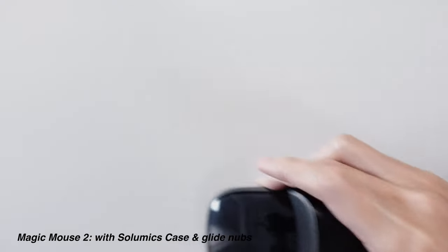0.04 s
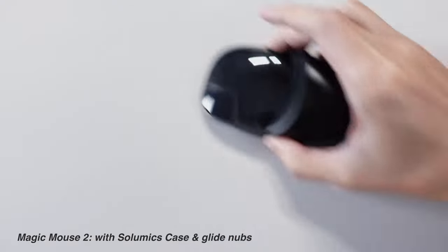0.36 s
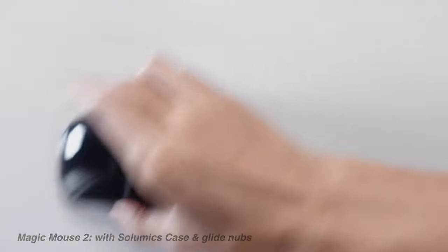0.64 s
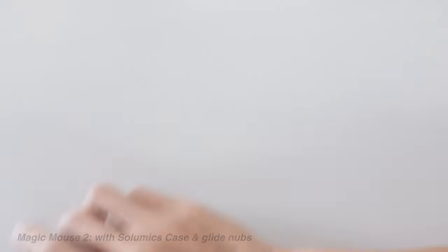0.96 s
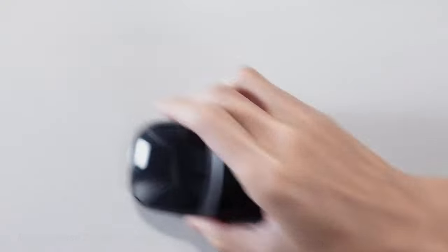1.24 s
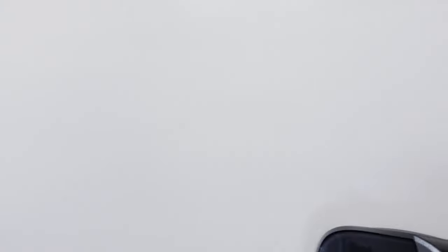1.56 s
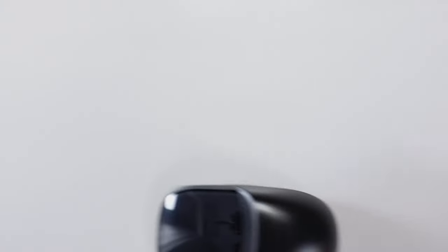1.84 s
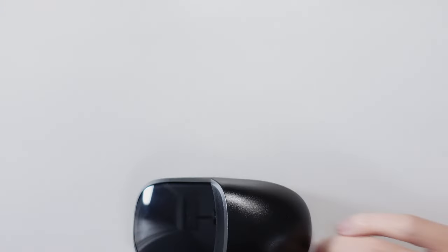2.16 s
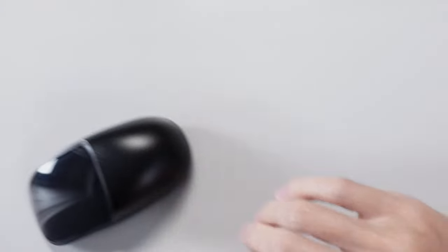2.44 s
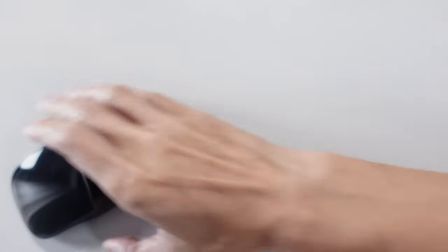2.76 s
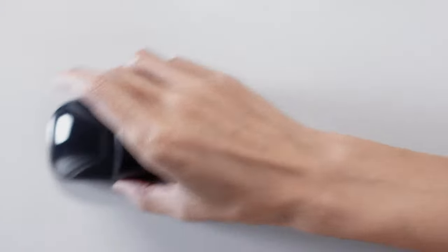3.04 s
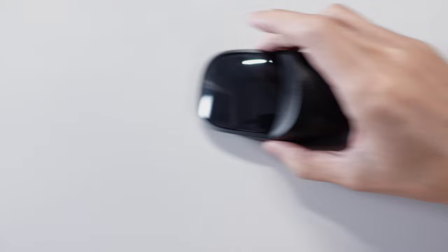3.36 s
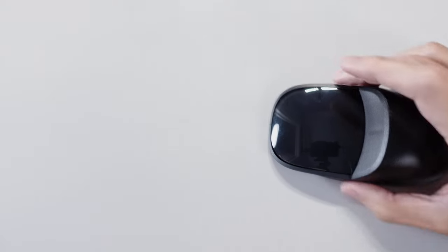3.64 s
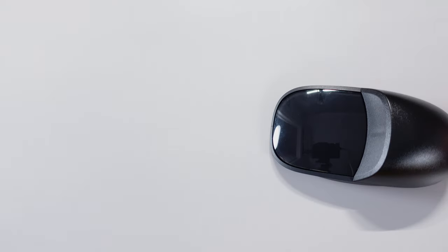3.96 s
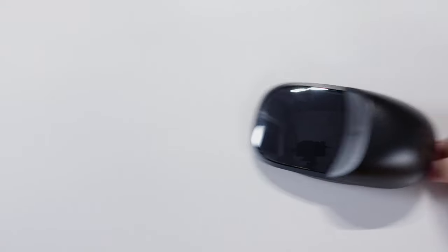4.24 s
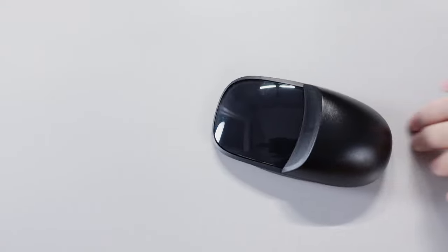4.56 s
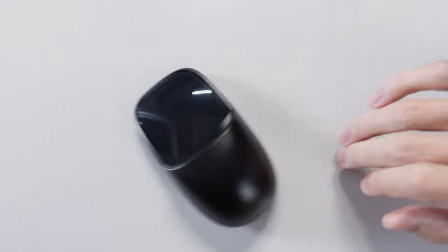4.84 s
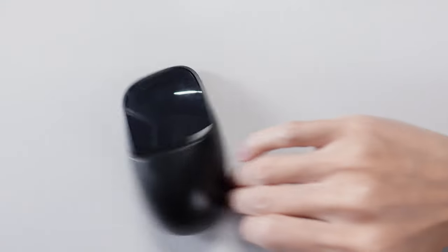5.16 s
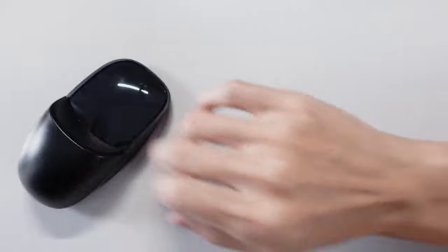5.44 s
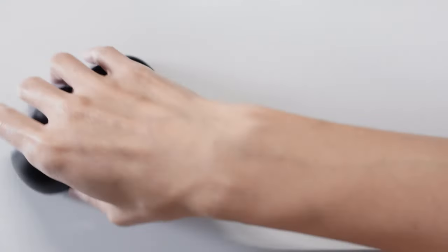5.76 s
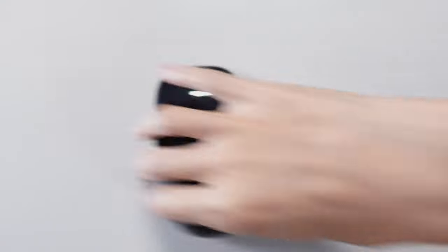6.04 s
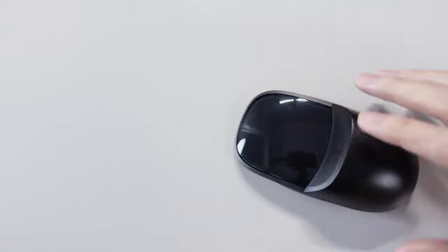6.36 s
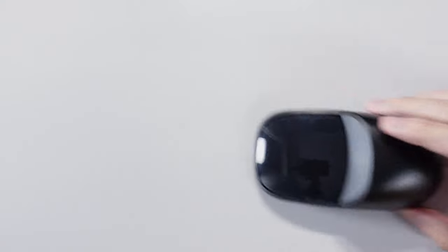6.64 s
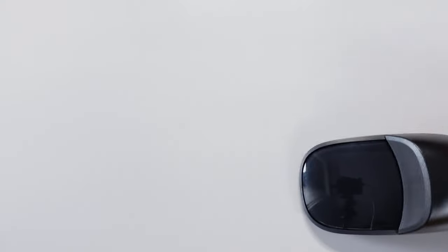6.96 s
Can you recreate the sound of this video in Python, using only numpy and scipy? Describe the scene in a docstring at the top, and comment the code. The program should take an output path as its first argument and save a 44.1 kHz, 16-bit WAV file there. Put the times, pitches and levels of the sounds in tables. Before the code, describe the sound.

A plastic computer mouse is swept and flicked across a desk, hissing and rasping, with sharp clacks and soft bumps.

```python
"""First comes the hiss and rasp of a plastic computer mouse swept over a smooth desk, close by in a quiet
room. Its feet hiss on the fine grain; coarser grain rasps the shell and drums the desk top, and the
colour shifts as the mouse travels and turns. Fingers bump, a foot squeaks, skin brushes the desk and
the forearm sways it. Five times a finger flicks the mouse: the loose case clacks, then it glides to
a stop."""
import sys
import numpy as np
from scipy import signal
from scipy.fft import rfft, irfft, next_fast_len
from scipy.io import wavfile
from scipy.ndimage import uniform_filter1d, map_coordinates

SR = 44100
rng = np.random.default_rng(int(sys.argv[2]) if len(sys.argv) > 2 else 0)


def generate_wav(signal):
    """Clip the signal to [-1, 1] and save it as 16-bit WAV at the path in sys.argv[1]."""
    frames = np.transpose(np.atleast_2d(signal))
    scaled = np.clip(frames, -1, 1) * 32767
    pcm = np.round(scaled).astype(np.int16)
    wavfile.write(sys.argv[1], SR, pcm)


N = 308700

# Strokes with the mouse in hand; levels at top speed, ahead of the trims in scene():
# (start [s], fastest [s], stop [s], desk rumble [dB], desk drumming [dB], shell rasp [dB], hiss [dB],
# hiss tilt [dB/octave], singing resonance [Hz], its level over the rasp [dB])
SWEEPS = [ (-.15, .05, 0.23, -38.5, -35.5, -36, -33.5, 1.5, 595, -8),
          (.13, .34, 0.58, -38.5, -32, -28, -32.5, -2, 2010, -12),
          (.42, .80, 0.98, -35.5, -27, -22.5, -32.5, 1, 2100, -23),
          (.975, 1.09, 1.3, -36, -34.5, -28.5, -30.5, 0.5, 4900, -14),
          (1.23, 1.348, 1.36, -36.5, -32, -30, -34.5, 3, 1950, -14),
          (2.84, 3.25, 3.75, -36.5, -31, -31.5, -38.5, 2, 877, -8),
          (5.745, 5.82, 5.97, -35, -35.5, -46, -58, -4.5, 802.4, -6),
          (5.88, 6.12, 6.455, -36, -25, -24.5, -35.5, 5.5, 611, -10.5),
          (6.56, 6.73, 6.943, -37.5, -38.5, -37, -36.5, -1.5, 2301, -14)]
# Slow sway of the whole desk: (pitch [Hz], width [Hz], held level [dB], gliding level [dB])
DESK_SWAY = [(81, 3.5, 4, 2), (101.7, 8.1, 3, -3.5), (124.4, 21, 2, -3.5), (141.8, 11.6, -1, 5.5),
             (163.5, 25, 1, -10)]
# Bending modes of the desk top: (pitch [Hz], width [Hz], held level [dB], gliding level [dB])
DESK_TOP = [(214.9, 11.6, -4.5, 1), (246.5, 11.7, 3, -3), (273.4, 26, -3.5, -18), (308, 65, -14.5, -19),
            (396.1, 11.7, 5.5, 1.5), (433, 14.6, 1.5, -3.5), (458.4, 6.3, -4, -8), (463, 48, -12.5, -10.5)]
# Resonances of the shell on the desk: (pitch [Hz], width [Hz], held level [dB], gliding level [dB])
SHELL_MODES = [(556, 96, -6.5, -1.5), (715, 88, -5, 4), (843, 55, 0, 5.5), (909, 49, 2.5, 6),
               (1117, 200, -2, 2.5), (1343, 135, -1, 2.5), (1511, 80, 2.5, 7), (1724, 160, -3, -1),
               (1970, 136, -5.5, 0), (2246, 73, -5.5, 1.5), (2463, 94, -11, -9.5), (2720, 130, -14, -7.5),
               (3520, 400, -14, -9)]
# Colour of the feet's hiss: (frequency [Hz], held level [dB], gliding level [dB])
HISS_EQ = [(1500, -10, -9), (3040, -2.5, -10.5), (4040, -3.5, -5.5), (4570, -2.5, -8), (5200, 5.5, 5),
           (6050, 1.5, 3), (6600, -3, -1), (7930, -1, 1), (8850, -4, -2), (9450, -1.5, -2.5),
           (10400, -2, -1.5), (11700, -4, -2.5), (12500, -3.5, -3), (15300, -10, -6.5)]
# Colour of the quiet room: (frequency [Hz], level [dB])
ROOM_TONE_EQ = [(25, -8.5), (80, 4), (130, -5), (250, -8), (500, -16.5), (1000, -21), (2500, -24.5),
                (8000, -27.5), (15700, -29)]
# Soft bumps of fingers and feet: (time [s], thud [dB], tap [dB])
BUMPS = [(.518, -43, -26.5), (2.08, -36, -40.5), (2.398, -23, -28), (2.441, -24, -23), (2.69, -34, -59),
         (2.928, -26, -50), (2.943, -26, -33), (2.962, -23.5, -30), (2.999, -40, -26), (3.08, -52, -23),
         (3.733, -26, -38), (3.8, -41, -42.5), (4.281, -25.5, -39), (4.559, -34.5, -34),
         (4.596, -36, -35.5), (4.9, -45, -25.5), (5.092, -35, -31), (5.134, -37, -42), (5.599, -31, -37.5),
         (5.77, -33, -37), (5.987, -38, -17)]
# Decay of the room: (frequency [Hz], t60 [s])
ROOM_DECAY = [(150, 0.46), (1500, 0.22), (6000, 0.42), (14000, 0.047)]
# A foot catches and squeaks: (centre [s], length [s], pitch [Hz], level [dB])
SQUEAKS = [(.84, 0.16, 2150, -37), (.945, .035, 4870, -46), (1.1, 0.13, 2090, -33.5),
           (1.736, 0.054, 2770, -38), (6.162, 0.12, 2226, -31.5)]
# The hand bears down for a moment: (centre [s], length [s], drumming change [dB], rasp change [dB])
PRESSES = [(0.888, 0.13, 4.5, 2), (1.165, 0.12, 9.5, 6), (1.236, 0.11, 13.5, 9), (3.11, 0.12, 5.5, 3.5),
           (6.05, .08, 2.5, 0), (6.207, 0.12, -2.5, 1.5)]
# Scuffs as the fingers take hold, turn or let go, ahead of the trims:
# (time [s], length [s], rasp [dB], hiss [dB])
GRABS = [(0.938, 0.11, -48, -54), (2.838, 0.1, -47, -44), (3.614, 0.19, -50, -48.5),
         (5.755, 0.17, -51, -49), (6.38, 0.12, -54, -57), (6.582, 0.014, -46, -48)]
# Hard contacts of nail, case and mouse:
# (time [s], click [dB], click t60 [s], pitch of the struck spot [Hz], knock [dB], knock pitch [Hz])
CLACKS = [(1.6387, -11.5, 0.015, 6360, -5, 932), (1.6439, -11.5, 0.0066, 7550, -24, 910),
          (1.7026, -17, 0.005, 2740, -13.5, 1050), (1.7775, -23.5, 0.032, 7440, -36, 1000),
          (2.2715, -17, 0.0057, 3640, -14, 1020), (2.2735, -12.5, 0.013, 3380, -3, 1008),
          (4.2513, -10, 0.01, 5470, -12, 900), (4.2787, -18, 0.0076, 2600, -10.5, 990),
          (4.6917, -8.5, 0.0095, 8240, -10.5, 1120), (4.6945, -9.5, 0.0082, 2260, -4.5, 1005),
          (5.1945, -13.5, 0.013, 5460, -4.5, 1090), (5.1968, -9.5, 0.0077, 3460, -2, 925)]
# Colour of the plastic's click: (frequency [Hz], level [dB])
CLICK_EQ = [(500, -40), (1900, -13), (3200, 9.5), (4300, -3.5), (5600, 7.5), (6800, 2.5), (8100, 3),
            (9800, -8), (11200, -1.5), (12500, 1), (15700, -10.5)]
# Modes of the hollow case: (multiple of the knock pitch [ratio], level [dB], t60 [s])
CASE_MODES = [(.45, -24, 0.095), (1, -2, 0.017), (1.16, -5.5, 0.022), (1.39, 5.5, 0.0047),
              (1.719, -51, 0.024), (2.4, -16.5, 0.015)]
# Free glides after a flick: the columns of SWEEPS, then (skid relative to the hiss [dB])
GLIDES = [ (1.645, 1.715, 2.066, -37, -36.5, -33, -36, -2, 1090, -10, -7),
          (2.297, 2.368, 2.687, -32, -28, -31.5, -34.5, 0.5, 2230, -10, -3),
          (4.26, 4.305, 4.524, -34.5, -36.5, -39.5, -34.5, -1, 1183, -6.5, -29),
          (4.70, 4.76, 5.064, -30.5, -33, -33.5, -36.5, 1, 2090, -13.5, 3),
          (5.205, 5.26, 5.56, -29.5, -33, -30, -38.5, -0.5, 1650, -12, 1)]
# The forearm drags on the desk: (centre [s], length [s], level [dB])
FOREARM_DRAGS = [(1.72, 0.062, -34), (2.718, .2, -43), (3.68, 0.57, -43), (4.596, 0.15, -47),
                 (5.72, 0.56, -39.5), (6.302, 0.42, -36.5), (6.723, 0.059, -36)]
# Skin brushes the desk as the hand reaches and sweeps: (centre [s], length [s], level [dB])
BRUSHES = [(2.202, 0.27, -52), (3.385, 0.53, -42), (4.26, 0.062, -54), (5.165, 0.16, -49),
           (5.692, 0.083, -58), (6.015, 0.37, -39.5)]
# Each layer grows as a power of the speed: (rumble, drumming, rasp, hiss) [exponents]
HELD_POWERS, FREE_POWERS = (0.39, 1.31, 2.02, 1.2), (0.45, 0.66, 1.06, 0.76)


def amp(db):
    """Decibels to gain."""
    return 10 ** (np.asarray(db) / 20)


def unit(x):
    """x at rms 1."""
    return x / np.sqrt(np.mean(x ** 2) + 1e-20)


def along(points, hz):
    """Read (frequency [Hz], value) points on a log axis."""
    f, v = np.transpose(points)
    return np.interp(np.log(hz + 1), np.log(f), v)


def filtered(x, response):
    """x through a frequency response."""
    m = next_fast_len(len(x) + SR // 2)
    return irfft(rfft(x, m) * response(np.fft.rfftfreq(m, 1 / SR)), m)[:len(x)]


def coloured(x, eq):
    """x through an EQ curve, at rms 1."""
    return unit(filtered(x, lambda hz: amp(along(eq, hz))))


def resonate(x, modes):
    """x through a body's modes, alternating in polarity: (pitch [Hz], width [Hz], level [dB])."""
    return filtered(x, lambda f: sum(
        (-1) ** k * amp(db) * 1j * f * width / (hz * hz - f * f + 1j * f * width)
        for k, (hz, width, db) in enumerate(modes)))


def body(table, free):
    """A body's modes in a free glide or under the hand's weight."""
    return [(hz, width, free_db if free else held_db) for hz, width, held_db, free_db in table]


def soften(x, edge_hz):
    """A soft contact passes little above its edge."""
    return signal.sosfilt(signal.butter(2, edge_hz, fs=SR, output="sos"), x)


def steady(x, memory_s):
    """Continuous rubbing keeps a mode at an even strength."""
    power = uniform_filter1d(x ** 2, max(2, round(memory_s * SR)))
    return x / np.sqrt(abs(power) + 1e-20)


def wobble(rate):
    """A smooth random curve, rate knots a second."""
    return map_coordinates(rng.standard_normal(int(N * rate / SR) + 4), [np.arange(N) * rate / SR])


def swell(s, length):
    """A smooth rise and fall around time s."""
    return np.exp(-(2 * (np.arange(N) / SR - s) / length) ** 2)


def decay(t, t60):
    """A fade of 60 dB every t60 seconds."""
    return np.exp(-np.log(1000) * t / t60)


def add(track, s, sound):
    """Mix a sound into the track at time s."""
    part = track[round(s * SR):][:len(sound)]
    part += sound[:len(part)]


def layer_gains(speed, levels_db, powers):
    """Rumble, drumming, rasp and hiss ride the speed of a stroke."""
    return np.array([amp(db) * np.maximum(speed, 1e-6) ** power for db, power in zip(levels_db, powers)])


def sweep(t, times, levels_db):
    """The hand speeds the mouse up and slows it again in one smooth arc."""
    speed = np.sin(np.interp(t, times, [0, np.pi / 2, np.pi]))
    return layer_gains(speed, levels_db, HELD_POWERS)


def friction_tone(noise, hz, q):
    """Friction feeds one narrow resonance: noise rung through it twice."""
    mode = [(hz, hz / q, 0)]
    return unit(resonate(resonate(noise, mode), mode))


def travel(strokes, motion):
    """Lay out strokes of one kind: four layer envelopes, the hiss tilts and the singing of the feet."""
    powers, tilts, singing = np.zeros((4, N)), [], np.zeros(N)
    for start, fastest, stop, rumble_db, drum_db, rasp_db, hiss_db, tilt, hz, tone_db, *skid in strokes:
        onset = max(start, 0)
        t = np.arange(onset, stop, 1 / SR)
        layers = motion(t, (start, fastest, stop), (rumble_db, drum_db, rasp_db, hiss_db), *skid)
        for track, layer in zip(powers, layers):
            add(track, onset, layer ** 2)  # overlapping strokes add in power
        _, _, rasping, _ = layers
        tone = friction_tone(rng.standard_normal(N)[:len(t)], hz, q=8.5)
        add(singing, onset, amp(tone_db) * rasping * tone)
        tilts.append((fastest, tilt))
    return np.sqrt(powers), tilts, singing


def grain(rate, spread_db):
    """Tiny collisions of the feet with the surface, at random times and sizes."""
    struck = rng.random(N) < rate / SR
    return unit(struck * rng.standard_normal(N) * amp(spread_db * rng.standard_normal(N)))


def drifting(x, drift_db, width_hz, hold_s):
    """Bands swell and fade at random, as when the contact meets other spots of the desk."""
    hz, t, spectrum = signal.stft(x, SR, nperseg=1024)
    drift = rng.standard_normal(spectrum.shape)
    for axis, span in enumerate([width_hz / hz[1], hold_s / t[1]]):
        for _ in range(2):
            drift = uniform_filter1d(drift, max(1, round(span)), axis, mode="wrap")
    return unit(signal.istft(spectrum * amp(drift_db * unit(drift)), SR, nperseg=1024)[1][:N])


def tilted(x, tilts, pivot_hz=8000):
    """The hiss turns brighter or duller with the angle of the mouse in each stroke."""
    hz, t, spectrum = signal.stft(x, SR, nperseg=256)
    octaves = np.log2(np.maximum(hz, pivot_hz / 2) / pivot_hz)
    slope = np.interp(t, *np.transpose(tilts))
    return signal.istft(spectrum * amp(np.outer(octaves, slope)), SR, nperseg=256)[1][:N]


def slide(gains, tilts, free, trims_db, chatter_db, rasp_edge_hz, bite_db):
    """Coarse grain shakes desk and shell, fine grain hisses; the load on the feet chatters."""
    rumbling, drumming, rasping, hissing = (gain * amp(db) for gain, db in zip(gains, trims_db))
    load = amp(chatter_db * wobble(130))
    coarse = grain(rate=5000, spread_db=1.5) * load
    rumble = steady(soften(resonate(coarse, body(DESK_SWAY, free)), edge_hz=270), memory_s=0.16)
    drum = steady(soften(resonate(coarse, body(DESK_TOP, free)), edge_hz=433), memory_s=0.14)
    shell = drifting(resonate(coarse, body(SHELL_MODES, free)), drift_db=2.0, width_hz=130, hold_s=0.14)
    dull = steady(soften(shell, rasp_edge_hz), memory_s=0.075)
    # harder rubbing makes shorter collisions, so the rasp opens up
    bright = coloured(shell, [(1500, -25), (2800, -2.5), (3700, -7), (5000, -10), (9000, -30)])
    bite = amp(bite_db) * bright * rasping / rasping.max()
    hiss_eq = [(hz, free_db if free else held_db) for hz, held_db, free_db in HISS_EQ]
    fine = coloured(grain(rate=27000, spread_db=5.0) * np.sqrt(load), hiss_eq)
    hiss = tilted(drifting(fine, drift_db=2.3, width_hz=230, hold_s=0.13), tilts)
    return rumbling * rumble + drumming * drum + rasping * (dull + bite) + hissing * hiss


def room_tone():
    """A steady, dark bed of noise from the quiet room."""
    return amp(-48.5) * coloured(rng.standard_normal(N), ROOM_TONE_EQ)


def bumps(thud_hz=118, thud_t60=0.086, thud_rise_s=0.0064):
    """Soft blows: a slow, damped push into the desk and a dull tap on the shell."""
    out, t = np.zeros(N), np.arange(SR // 3) / SR
    thud = np.sin(2 * np.pi * thud_hz * t) * decay(t, thud_t60) * (1 - np.exp(-t / thud_rise_s))
    ring = resonate(signal.unit_impulse(len(t)), body(DESK_TOP + SHELL_MODES, free=False))
    tap = soften(ring, edge_hz=570)
    for s, thud_db, tap_db in BUMPS:
        add(out, s, amp(thud_db) * thud / abs(thud).max() + amp(tap_db) * tap / abs(tap).max())
    return out


def room_reverb(x):
    """The short tail of a small room; the top treble dies first."""
    hz, t, spectrum = signal.stft(rng.standard_normal(SR // 2), SR, nperseg=256)
    fade = decay(t, along(ROOM_DECAY, hz)[:, None])
    tail = signal.istft(spectrum * fade, SR, nperseg=256)[1]
    return signal.fftconvolve(x, tail / np.linalg.norm(tail))[:N]


def squeaks():
    """A foot sticks and slips, feeding one narrow resonance for a moment."""
    return sum(amp(db) * swell(s, length) * friction_tone(rng.standard_normal(N), hz, q=12)
               for s, length, hz, db in SQUEAKS)


def presses_and_grabs(gains, grab_rise_s=0.0037):
    """The hand's weight changes the drive on desk and shell; each grab adds a sudden, fading scuff."""
    rumbling, drumming, rasping, hissing = gains.copy()
    for s, length, drum_db, rasp_db in PRESSES:
        weight = swell(s, length)
        drumming *= amp(drum_db * weight)
        rasping *= amp(rasp_db * weight)
    for s, length, rasp_db, hiss_db in GRABS:
        scuff = np.interp(np.arange(0, length, 1 / SR), [0, grab_rise_s, length], [0, 1, 0]) ** 0.5
        add(rasping, s, amp(rasp_db) * scuff)
        add(hissing, s, amp(hiss_db) * scuff)
    return rumbling, drumming, rasping, hissing


def clacks(knock_rise_s=0.0014, spot_db=-4, spot_width_hz=650, ring_db=-29, ring_t60=0.11):
    """Each hard contact snaps the plastic, which rings on faintly, and knocks the hollow case."""
    out, t = np.zeros(N), np.arange(SR // 8) / SR
    attack = 1 - np.exp(-t / knock_rise_s)
    for s, click_db, click_t60, spot_hz, knock_db, knock_hz in CLACKS:
        snap, spot_noise = rng.standard_normal((2, len(t)))
        spot = unit(resonate(spot_noise, [(spot_hz, spot_width_hz, 0)]))
        plastic = unit(coloured(snap, CLICK_EQ) + amp(spot_db) * spot)
        click = plastic * (decay(t, click_t60) + amp(ring_db) * decay(t, ring_t60))
        knock = sum(amp(db + rng.normal(0, 1)) * decay(t, t60) * np.sin(2 * np.pi * knock_hz * ratio * t)
                    for ratio, db, t60 in CASE_MODES)
        add(out, s, amp(click_db) * click + amp(knock_db) * knock * attack)
    return out


def glide(t, times, levels_db, skid_db, kick_share=0.39, skid_s=0.035):
    """The finger shoves the mouse off with a short skid; friction then brakes it at an even rate."""
    start, fastest, stop = times
    shove = np.interp(t, [start, fastest], [0, 1]) ** 2.8  # builds up late, after the instant kick
    braking = np.interp(t, [fastest, stop], [1, 0])
    speed = (kick_share + (1 - kick_share) * shove) * braking
    skid = amp(skid_db) * np.exp(-(2 * (t - fastest) / skid_s) ** 2)
    skid_lift = 1 + np.outer([0, 0, 0.76, 1], skid)  # lifts only rasp and hiss
    return layer_gains(speed, levels_db, FREE_POWERS) * skid_lift


def forearm():
    """Soft skin drags on the desk and stirs mostly its slow sway."""
    leaning = sum(amp(db) * swell(s, length) for s, length, db in FOREARM_DRAGS)
    desk = resonate(rng.standard_normal(N), body(DESK_SWAY + DESK_TOP, free=False))
    return leaning * steady(soften(desk, edge_hz=95), memory_s=0.18)


def brushes():
    """Skin on the desk gives a thin, airy hiss."""
    touch = sum(amp(db) * swell(s, length) for s, length, db in BRUSHES)
    air_eq = [(1000, -28), (6000, -6), (8500, -8), (10500, 0), (12500, -2), (15700, -5)]
    air = coloured(rng.standard_normal(N), air_eq)
    return touch * drifting(air, drift_db=1.2, width_hz=400, hold_s=0.12)


def scene():
    """Mono mix of sweeps, glides and contacts over room tone; only the hits feed the reverb."""
    swept, held_tilts, held_singing = travel(SWEEPS, sweep)
    glided, free_tilts, free_singing = travel(GLIDES, glide)
    # trims: (rumble [dB], drumming [dB], rasp [dB], hiss [dB])
    held = slide(presses_and_grabs(swept), held_tilts, free=False, trims_db=(-3.0, -2.0, -2.5, -0.94),
                 chatter_db=1.13, rasp_edge_hz=2870, bite_db=-8.5)
    free = slide(glided, free_tilts, free=True, trims_db=(-3.5, -1.5, -3.5, -0.5),
                 chatter_db=1.5, rasp_edge_hz=6200, bite_db=-6.5)
    hits = clacks() + bumps()
    bed = room_tone()
    rubbing = held + free + held_singing + free_singing + squeaks() + brushes() + forearm()
    return (rubbing + hits + amp(-14) * room_reverb(hits) + bed)[None]


def record(dry, top_hz=15900, fade_hz=400):
    """A steep high cut takes off the very top."""
    return np.array([filtered(channel, lambda hz: np.clip((top_hz - hz) / fade_hz + 0.5, 0, 1))
                     for channel in dry])


dry = scene()
out = record(dry)
generate_wav(out)
```